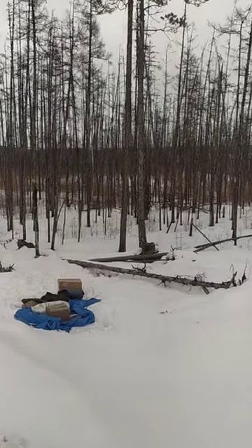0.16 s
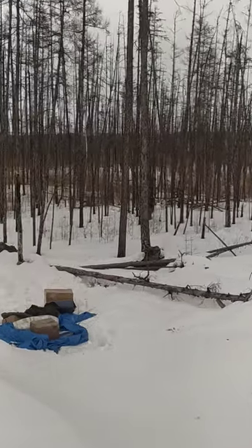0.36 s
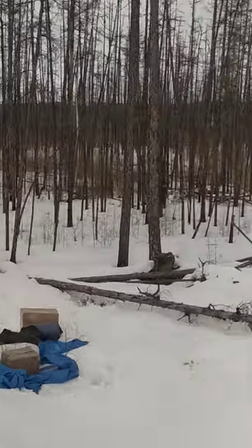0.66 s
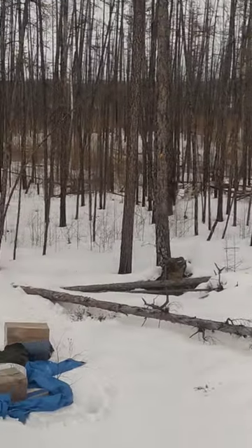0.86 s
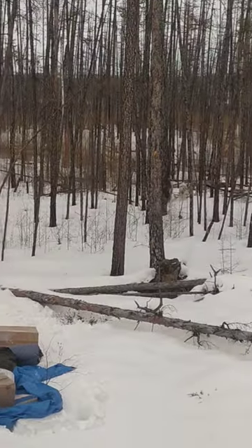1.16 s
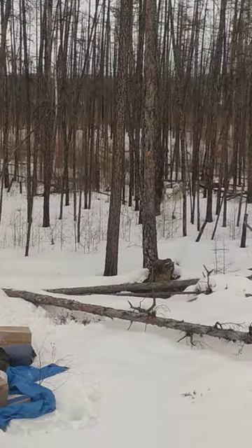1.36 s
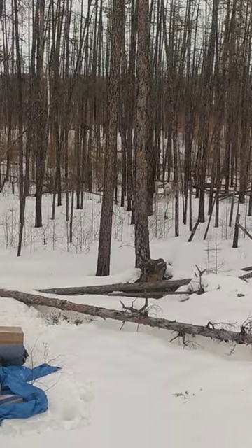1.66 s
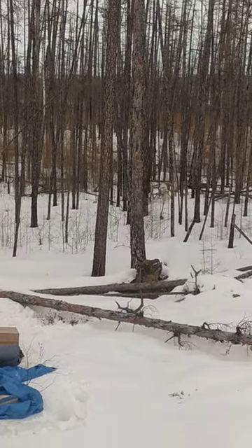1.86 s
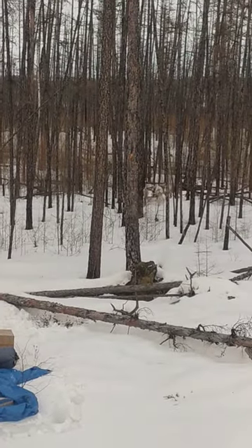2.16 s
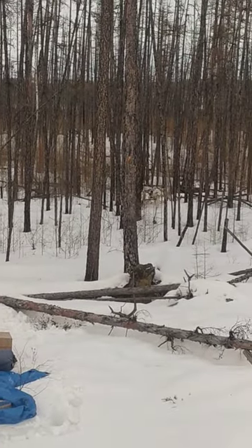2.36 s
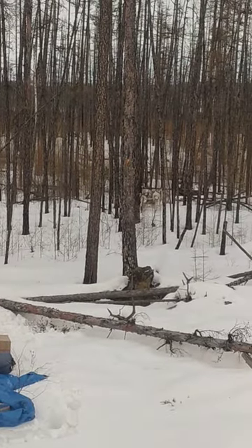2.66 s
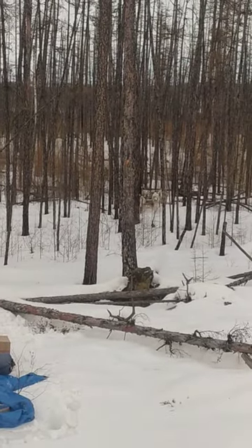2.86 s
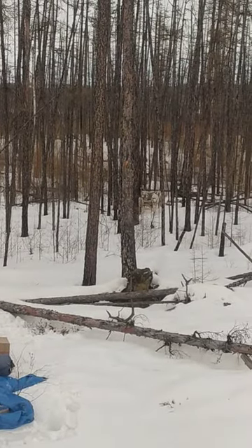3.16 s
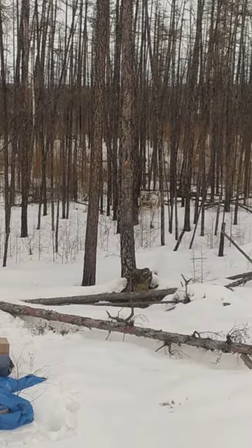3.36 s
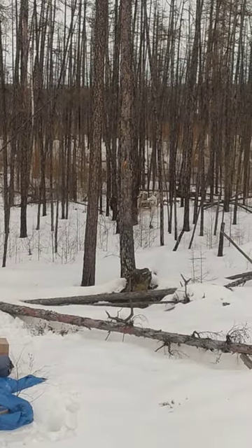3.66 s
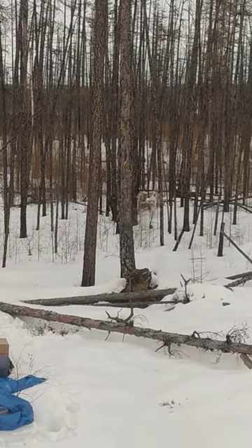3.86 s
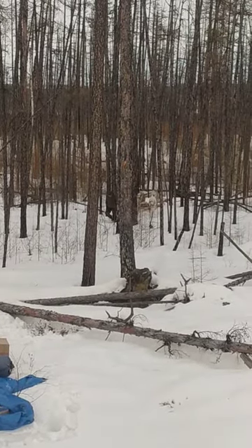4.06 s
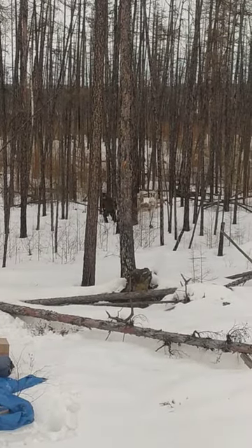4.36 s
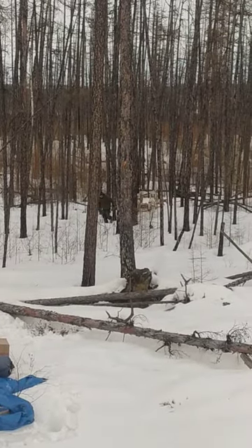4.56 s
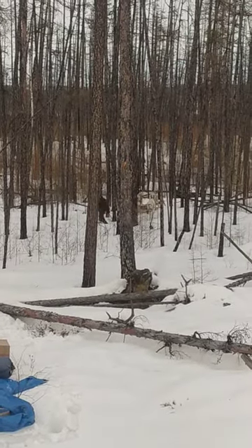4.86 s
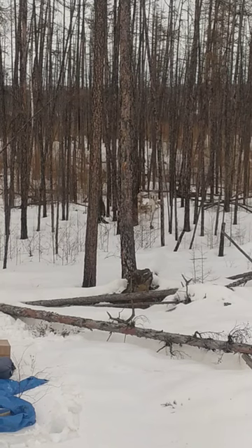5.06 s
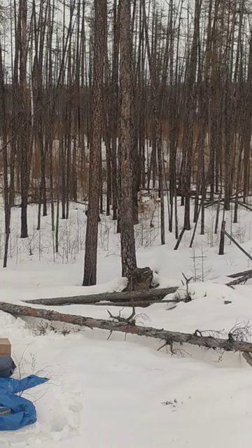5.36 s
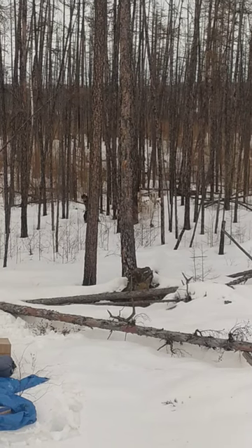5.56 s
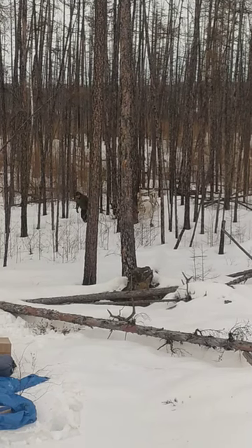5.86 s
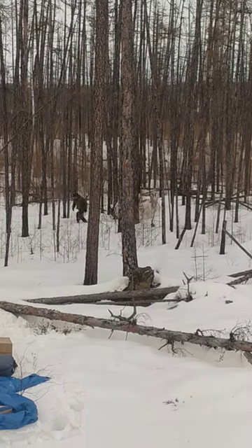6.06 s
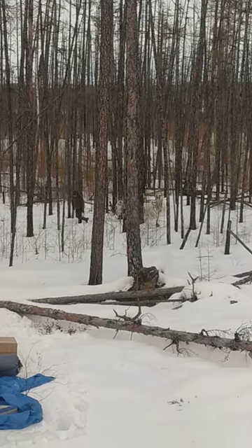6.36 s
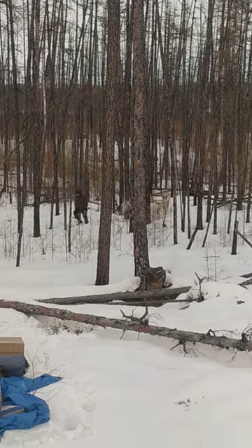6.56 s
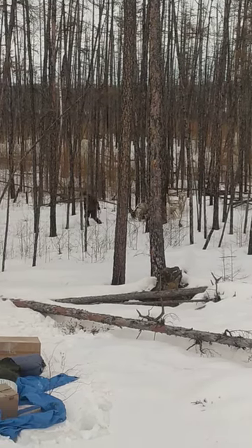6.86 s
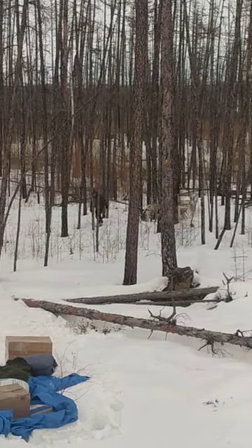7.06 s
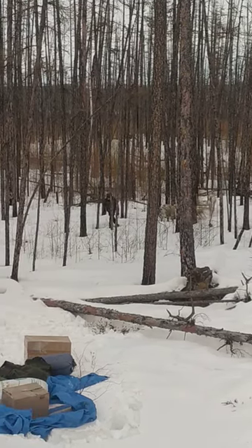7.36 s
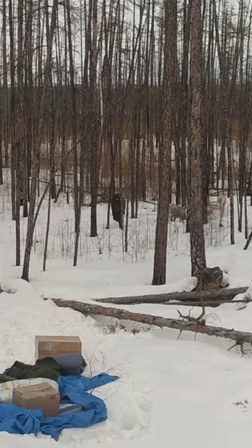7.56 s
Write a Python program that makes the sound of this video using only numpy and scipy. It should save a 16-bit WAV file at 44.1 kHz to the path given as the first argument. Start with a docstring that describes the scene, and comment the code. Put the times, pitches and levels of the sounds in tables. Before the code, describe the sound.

Strong wind buffets a handheld microphone in a snowy forest, low rumble throbbing unevenly, one hard early thump, then a roaring, hissing gust near the end.

```python
"""Strong wind in a snowy forest blows across the two microphone ports of a handheld camera.
From the start each port has its own turbulence and whistles (band-filtered noise), the left also a howl;
low buffeting (wavering tones and noise) throbs mostly on the right, its hardest thump near 1.7 s.
From about 6 s a gust roars and hisses (coloured noise);
its hiss narrows to the middle near 6.2 s and stays there."""
import sys
import numpy as np
from scipy import signal
from scipy.fft import rfft, irfft, next_fast_len
from scipy.io import wavfile
from scipy.ndimage import uniform_filter1d, map_coordinates

SR = 44100
rng = np.random.default_rng(int(sys.argv[2]) if len(sys.argv) > 2 else 0)


def generate_wav(signal):
    """Clip the signal to [-1, 1] and save it as 16-bit WAV at the path in sys.argv[1]."""
    frames = np.transpose(np.atleast_2d(signal))
    scaled = np.clip(frames, -1, 1) * 32767
    pcm = np.round(scaled).astype(np.int16)
    wavfile.write(sys.argv[1], SR, pcm)


N = 339261
FRAME = 2048  # STFT frame, samples


def amp(db):
    """Gain of a level in dB."""
    return 10 ** (np.asarray(db) / 20)


def unit(x):
    """x at rms 1."""
    return x / np.sqrt(np.mean(x ** 2) + 1e-20)


def curves(rows):
    """One value per sample for each column after the time."""
    s, *cols = np.transpose(rows)
    return [np.interp(np.arange(N) / SR, s, c) for c in cols]


def wobble(rate_hz):
    """A smooth random curve, rate_hz knots a second."""
    knots = rng.standard_normal(int(N * rate_hz / SR) + 4)
    return map_coordinates(knots, [np.arange(N) * rate_hz / SR])


def shaped(gain):
    """Noise of rms 1 under a gain of frequency (rows) and sample index (columns)."""
    overlap = FRAME * 3 // 4
    hz, t, z = signal.stft(rng.standard_normal(N), SR, nperseg=FRAME, noverlap=overlap)
    at = np.minimum((t * SR).astype(int), N - 1)
    _, noise = signal.istft(z * gain(hz[:, None], at), SR, nperseg=FRAME, noverlap=overlap)
    return unit(noise[:N])


def rush(spectrum, patchy_db):
    """Coloured noise with patches of random gain in time and frequency."""
    f, db = np.transpose(spectrum)

    def gain(hz, at):
        field = rng.standard_normal((len(hz), len(at)))
        field = uniform_filter1d(field, size=14, axis=0)
        field = uniform_filter1d(field, size=6, axis=1)
        return amp(np.interp(np.log(hz + 1), np.log(f), db) + patchy_db * unit(field))
    return shaped(gain)


def band(centre_hz, width):
    """Noise through a moving resonance with steep skirts; width is a share of the centre."""
    def gain(hz, at):
        detune = hz / centre_hz[at] - centre_hz[at] / (hz + 1)
        return (1 + (detune / width) ** 2) ** -1.5
    return shaped(gain)


def wavering(hz, drift, swell_db):
    """A tone of rms 1 whose pitch and level wander quickly."""
    cycles = np.cumsum(hz * (1 + drift * wobble(30))) / SR
    return unit(amp(swell_db * wobble(13)) * np.sin(2 * np.pi * cycles))


# thin top hiss: [t/s, left level/dB, right level/dB]
THIN_LEVELS = [(0, -75.5, -64.5), (2.3, -81, -62.5), (3, -73, -63), (4.6, -70, -63.5), (5.1, -68, -64),
               (5.7, -70, -64), (5.9, -65.5, -63.5), (6.6, -66, -66), (6.75, -67, -64), (6.85, -61, -64),
               (6.95, -67, -66), (7.69, -63, -63)]
# its spectrum: [f/Hz, relative level/dB]
THIN_SPECTRUM = [(9500, -70), (10800, -18), (11500, -6), (14500, -7), (16000, -14.5)]


def thin_hiss():
    """A thin hiss at the very top, unrelated between the ports."""
    ports_db = curves(THIN_LEVELS)
    return np.array([amp(db + 0.65 * wobble(10)) * rush(THIN_SPECTRUM, patchy_db=2.5) for db in ports_db])


# low boom: [t/s, level/dB]
BOOM_LEVELS = [(0, -49), (2, -37.5), (3, -36.5), (3.6, -41), (5, -34.5), (5.8, -35), (6.35, -40),
               (6.55, -31), (6.8, -28.5), (6.95, -34), (7.1, -34.5), (7.69, -39)]
BOOM_HZ = 116.7


def boom():
    """A broad low resonance in the wind noise, alike at both ports."""
    return amp(curves(BOOM_LEVELS)[0]) * band(np.full(N, BOOM_HZ), width=0.76)


# wind overall, also played by roar and throb:
# [t/s, roar level/dB, steady buffeting level/dB, left-right likeness of the hiss/0-1]
WIND = [(0, -35.5, -36.5, 0.2), (.8, -36.5, -39, 0.26), (1.3, -34.5, -33, 0.11), (1.55, -35, -32.5, 0.3),
        (1.9, -36.5, -30, 0.15), (2.4, -37, -37, 0.3), (3.2, -35, -37.5, 0.14), (4, -31.5, -31.5, 0.4),
        (4.6, -37.5, -36, 0.27), (5.2, -34, -36, 0.5), (5.8, -32, -34.5, 0.38), (6.15, -27.5, -37, 0.46),
        (6.27, -28.5, -33, 1), (6.5, -24.5, -31.5, 1), (6.9, -24.5, -30, 1), (7.1, -26, -30.5, 1),
        (7.69, -25, -37, 1)]
# hiss before the common lift: [t/s, fizz level/dB, dull hiss re fizz/dB, bright fizz re fizz/dB]
SPRAY_LEVELS = [(0.05, -71.5, 3, 0), (.8, -68.5, 2.5, -2), (1.5, -68, 3, -0.5), (2.1, -69.5, 5, 0),
                (2.33, -67.5, 5.5, -0.5), (2.47, -68.5, 3.5, -1.5), (2.8, -65.5, 3, -2.5),
                (3.5, -66, 2, -1.5), (4.75, -67, 1.5, -1), (4.92, -66, 2, -1), (5.6, -66, 1, -1),
                (5.88, -62, 1.5, -1), (6, -61.5, -2, -4.5), (6.2, -61, -1.5, -2), (6.42, -62.5, 0, -0.5),
                (6.57, -61, -3, -3), (6.7, -59.5, -2, -2), (6.8, -58.5, -1, -1), (6.95, -60.5, -0.5, -2),
                (7.15, -63, -3, -0.5), (7.22, -63.5, -1, 3), (7.3, -63.5, -2, 2), (7.42, -64.5, -3, 3),
                (7.52, -63.5, -3, -1), (7.69, -65, 0, 1)]
# spectra of dull hiss, fizz, bright fizz: [f/Hz, relative level/dB]
DULL_SPECTRUM = [(800, -40.5), (2000, 2), (3000, 0.5), (4500, -5.5), (7000, -11), (16000, -40)]
FIZZ_SPECTRUM = [(2500, -23), (4000, -5.5), (5500, -1.5), (7000, -3.5), (8500, -4.5), (11000, -12.5),
                 (16000, -32)]
BRIGHT_SPECTRUM = [(5000, -24), (7000, -6.5), (8300, -3), (9500, -1.5), (10600, -1), (11400, -6.5),
                   (14500, -16), (16000, -14)]
# gain of the side signal re mid: [dull hiss/dB, fizz/dB, bright fizz/dB]
SIDE_GAIN_DB = [1, -2.5, 2.5]


def spray():
    """Hiss and fizz as mid and side noise: wide at first, then narrowed to the middle from about 6.2 s."""
    *_, alike = curves(WIND)
    fizz_db, dull_db, bright_db = curves(SPRAY_LEVELS)
    turn = np.arccos(np.clip(alike, 0, 1)) / 2
    layers = [(dull_db + 0.66 * wobble(18), DULL_SPECTRUM),
              (0.44 * wobble(13), FIZZ_SPECTRUM),
              (bright_db + 0.4 * wobble(13), BRIGHT_SPECTRUM)]

    def air(patchy_db, gains_db):
        return sum(amp(fizz_db + db + gain_db) * rush(spectrum, patchy_db)
                   for (db, spectrum), gain_db in zip(layers, gains_db))
    mid = np.cos(turn) * air(patchy_db=1.54, gains_db=np.zeros(3))
    side = np.sin(turn) * air(patchy_db=2.5, gains_db=SIDE_GAIN_DB)
    lift_db = 2.5 + 0.5 * wobble(25) + 0.34 * wobble(35)
    return amp(lift_db) * np.array([mid + side, mid - side])


# roar spectrum: [f/Hz, relative level/dB]
ROAR_SPECTRUM = [(15, -16), (40, -8.5), (80, -3), (130, -1.5), (250, -11), (450, -18), (800, -26),
                 (1400, -38), (2500, -54.5), (5000, -91), (16000, -110)]


def roar():
    """Low-weighted wind noise, alike at both ports, strongest in the late gust."""
    roar_db, *_ = curves(WIND)
    return amp(roar_db + 1.24 * wobble(12)) * rush(ROAR_SPECTRUM, patchy_db=0.5)


# strongest buffets: [t/s, envelope peak/dB, length/s, f/Hz, left-right balance/dB]
THUMP_EVENTS = [(0.038, -20, 0.0074, 59, -2), (0.165, -23, 0.024, 57.5, -2), (0.275, -23.5, 0.036, 66, -1),
                (0.593, -21, 0.015, 61.7, -6), (1.206, -22.5, 0.038, 56.93, -4),
                (1.277, -21, 0.018, 56.4, -12), (1.34, -20, 0.028, 58.6, -1),
                (1.385, -26, 0.021, 66.07, -15), (1.562, -17, 0.033, 58.9, 1),
                (1.616, -18.5, 0.033, 50.9, -7), (1.699, -7.5, 0.044, 58.74, -7.5),
                (1.802, -15, 0.07, 58.5, -11.5), (1.907, -20, 0.021, 59.4, -9),
                (2.01, -17, 0.019, 61.9, -8), (2.155, -24, 0.022, 67, -7.0),
                (2.264, -28, 0.026, 71.3, -7.0), (2.355, -22, 0.049, 53.7, -4),
                (2.59, -24, 0.035, 58.44, -14), (2.636, -20.0, 0.017, 61.3, -6),
                (2.727, -25, 0.033, 66.8, -12), (2.92, -27, 0.016, 74.6, -11),
                (3.015, -29, 0.018, 60.85, -16), (3.056, -25, 0.018, 56.1, -6.0),
                (3.308, -24, 0.015, 57.74, -7), (3.36, -28, 0.054, 61.6, -15),
                (3.51, -28, 0.029, 56.86, -7.0), (3.574, -29, 0.033, 55.5, -18),
                (3.669, -15, 0.032, 59.86, -7), (3.935, -19.5, 0.042, 57.9, -8),
                (4.002, -21, 0.024, 62.86, -4), (4.073, -32, 0.03, 67.7, -10),
                (4.214, -27, 0.03, 57.93, -12), (4.297, -20.5, 0.046, 63.1, -12),
                (4.452, -22.5, 0.019, 60.96, -6), (4.502, -27, 0.053, 65.35, -8),
                (4.567, -21, 0.018, 58.7, -6), (4.653, -26, 0.02, 66.1, -7.0), (4.739, -22, 0.03, 72, -7),
                (4.827, -27, 0.017, 58.25, -8), (4.871, -19, 0.029, 56.83, -8.0),
                (5.036, -20.5, 0.051, 61.13, -4), (5.188, -29, 0.022, 57.2, 0.0),
                (5.266, -24.5, 0.023, 70.0, -9), (5.449, -25.5, 0.026, 73.6, -7),
                (5.557, -29, 0.017, 69.6, -4.0), (5.702, -24, 0.018, 59.1, -8),
                (5.749, -16.5, 0.039, 62, -17.5), (5.832, -22, 0.019, 79.9, 2),
                (5.894, -18, 0.029, 60.06, -3), (5.973, -21.5, 0.026, 58.5, 1),
                (6.087, -20.5, 0.026, 73.4, -7), (6.15, -23.5, 0.017, 68.1, -5),
                (6.242, -34, 0.027, 59.16, -10), (6.286, -24, 0.03, 55.2, -7.0),
                (6.337, -19, 0.015, 63.5, -6.0), (6.394, -22, 0.014, 63.2, 3),
                (6.525, -22, 0.019, 62.0, -1.0), (6.589, -21, 0.029, 65.83, 0.0),
                (6.666, -21, 0.017, 60.95, -3), (6.743, -14.5, 0.02, 72.7, 1), (6.778, -17, 0.021, 67.0, 1),
                (6.826, -16, 0.023, 71.55, -1), (6.907, -17, 0.02, 72.4, -4), (6.98, -15, 0.016, 75.25, -1),
                (7.011, -22, 0.016, 63.5, 0), (7.061, -26, 0.017, 63.8, -6.0),
                (7.1, -23, 0.059, 71.8, -4.0), (7.2, -19.5, 0.017, 59.95, -1),
                (7.3, -17, 0.026, 61.94, 0.0), (7.354, -23, 0.029, 57.83, -5.0),
                (7.411, -17.5, 0.03, 66.44, -2), (7.52, -17.5, 0.025, 62.0, 1),
                (7.561, -19, 0.025, 66.95, 2.0), (7.606, -17, 0.013, 65.5, -2)]
TAIL = 0.95  # thump fall time / rise time
LUMPS_PER_S, LUMPS_DB, SWAY_DB = 8.5, -0.5, 4  # weaker buffets: knot rate, depth, left-right scatter
ROLL_DB, ROLL_PITCH = -0.5, 0.813  # rolling rumble: level re lumps, pitch / buffet pitch
THUMP_LOOSE = 0.21  # share of the thumps in the noise that differs from port to port


def throb():
    """Eddies shed off the camera body pump both ports at a low, unsteady pitch, in lumps and thumps."""
    *_, hz, pan_db = curves(THUMP_EVENTS)
    t, thumps = np.arange(N) / SR, np.zeros(N)
    for at, db, length, *_ in THUMP_EVENTS:
        start = max(round((at - 2 * length) * SR), 0)
        near = slice(start, round((at + 2 * TAIL * length) * SR))
        width = np.where(t[near] > at, TAIL * length, length)
        thumps[near] += amp(db) * .5 ** ((2 * (t[near] - at) / width) ** 2)
    lumps = amp(curves(WIND)[1] + LUMPS_DB * np.tanh(wobble(LUMPS_PER_S)))
    # the sway fades where thumps dominate
    pan_db = pan_db + SWAY_DB * wobble(LUMPS_PER_S) * lumps / (lumps + thumps)
    loose = 0.66 * np.array([band(hz, width=0.47), band(hz, width=0.99)])
    tone = np.hypot(thumps, lumps) * wavering(hz, drift=0.1001, swell_db=0.6)
    roll = amp(ROLL_DB) * lumps * band(ROLL_PITCH * hz, width=0.36)
    buffets = tone + roll + np.hypot(THUMP_LOOSE * thumps, lumps) * loose
    return buffets * amp([pan_db / 2, -pan_db / 2])


# left port: [t/s, turbulence level/dB, howl f/Hz, howl level/dB,
# whistle f/Hz, whistle level before a 1 dB cut/dB, hollow f/Hz, hollow level/dB]
LEFT_WIND = [(0, -30, 426, -33, 1127, -48.5, 745, -52), (1, -30, 424, -32.5, 1270, -47, 766, -58),
             (1.7, -27, 454, -33.5, 1410, -48, 820, -50), (2.5, -29, 403, -32.5, 1536, -48.5, 870, -50),
             (3.3, -28.5, 415, -34, 1650, -47.5, 820, -55), (4, -28.5, 418, -34, 1696, -49, 820, -54),
             (5, -27.5, 442, -32, 1630, -51, 765, -55.5), (6, -29, 436, -32, 1424, -47, 790, -52),
             (7, -31, 466, -30, 1287, -47, 824, -53), (7.69, -30, 434, -30, 1220, -48, 825, -44)]
# left turbulence spectrum: [f/Hz, relative level/dB]
LEFT_SPECTRUM = [(15, -20), (35, 8), (70, 1), (120, -2.5), (220, -4), (340, -5.5), (600, -19), (900, -24.5),
                 (1500, -28), (2300, -45.5), (3200, -71), (16000, -120)]


def left_port():
    """Turbulence, a broad low howl, a breathy whistle with a fainter upper edge, a weak hollow resonance."""
    air_db, howl_hz, howl_db, whistle_hz, whistle_db, hollow_hz, hollow_db = curves(LEFT_WIND)
    air = amp(air_db + 0.64 * wobble(4.5)) * rush(LEFT_SPECTRUM, patchy_db=1.05)
    howl = amp(howl_db + 0.35 * wobble(7.2)) * band(howl_hz, width=0.32)
    breath = band(whistle_hz * (1 + 0.0087 * wobble(6)), width=0.42)
    core_hz = whistle_hz * (1.004 + 0.03 * wobble(12))
    core = amp(-4.5 + 1.6 * wobble(11)) * band(core_hz, width=0.11)
    edge_hz = whistle_hz * (1.184 + 0.017 * wobble(9.2))
    edge = amp(-12.5 + 2.5 * wobble(6)) * band(edge_hz, width=0.044)
    whistle = amp(whistle_db - 1.0 + 0.91 * wobble(18)) * (breath + core + edge)
    hollow = amp(hollow_db) * band(hollow_hz, width=0.24)
    return air + howl + whistle + hollow


# right port: [t/s, turbulence level/dB, lower whistle f/Hz, lower whistle level/dB, upper whistle level/dB]
RIGHT_WIND = [(0, -23.5, 474, -34, -52), (.45, -25, 516, -38.5, -59), (1, -23.5, 520.7, -43, -45.5),
              (1.3, -24.5, 523, -36.5, -48), (1.55, -23, 545, -36.5, -47), (2.05, -24.5, 506, -48, -48),
              (2.25, -24.5, 453, -42, -51), (2.7, -23.5, 444, -44, -51), (3.1, -25, 415, -41, -50),
              (3.7, -25, 429.2, -44, -55), (4.3, -26.5, 455, -41, -71), (4.7, -23, 496, -35, -45),
              (5.3, -25, 525, -45, -45), (5.75, -25.5, 483, -48, -50), (6.3, -23, 514, -38, -40),
              (6.9, -26, 470, -47, -68), (7.69, -25.5, 443, -43, -59)]
# right turbulence spectrum: [f/Hz, relative level/dB]
RIGHT_SPECTRUM = [(15, -14), (35, 11.5), (70, -2), (120, -0.5), (220, -4.5), (400, -4), (550, -12),
                  (750, -25.5), (1100, -33), (2000, -48), (3200, -83), (16000, -120)]


def right_port():
    """Turbulence and two thin whistles, narrow noise bands that glide together."""
    air_db, lower_hz, lower_db, upper_db = curves(RIGHT_WIND)
    air = amp(air_db + 0.11 * wobble(3.26)) * rush(RIGHT_SPECTRUM, patchy_db=0.2)
    lower = amp(lower_db + 2.1 * wobble(13)) * band(lower_hz * (1 + 0.014 * wobble(15)), width=0.042)
    upper_hz = 1.24 * lower_hz * (1 + 0.0075 * wobble(12))
    upper = amp(upper_db + 2.35 * wobble(9)) * band(upper_hz, width=0.11)
    return air + lower + upper


def scene():
    """Both ports and what they share."""
    shared = thin_hiss() + boom() + spray() + roar() + throb()
    return shared + np.array([left_port(), right_port()])


BASS_CUT_HZ, TOP_HZ, CEILING = 36, 15050, .95


def record(dry):
    """The camera cuts the deepest bass, rounds off the highest peaks and keeps nothing above TOP_HZ."""
    m = next_fast_len(N + FRAME)
    hz = np.fft.rfftfreq(m, 1 / SR)
    x = irfft(rfft(dry, m) * hz ** 3 / np.hypot(hz ** 3, BASS_CUT_HZ ** 3), m)
    x = x / (1 + np.abs(x / CEILING) ** 6) ** (1 / 6)
    return irfft(rfft(x) * (hz < TOP_HZ), m)[:, :N]


dry = scene()
out = record(dry)
generate_wav(out)
```